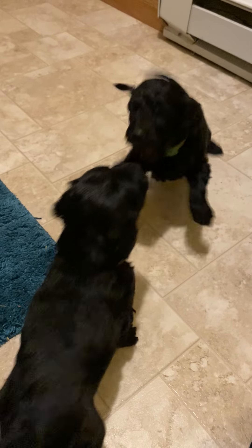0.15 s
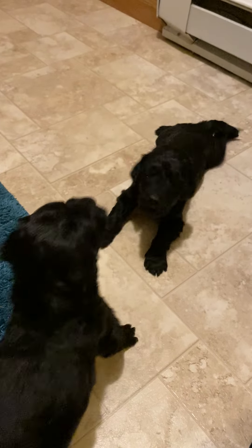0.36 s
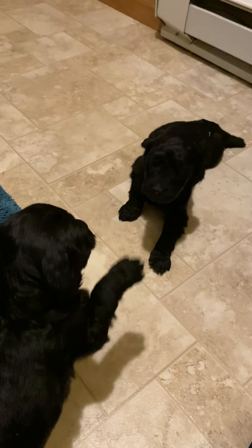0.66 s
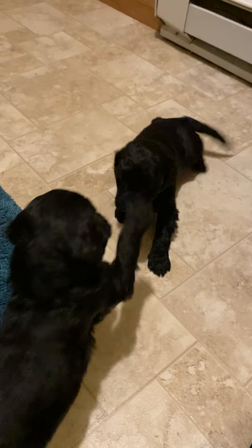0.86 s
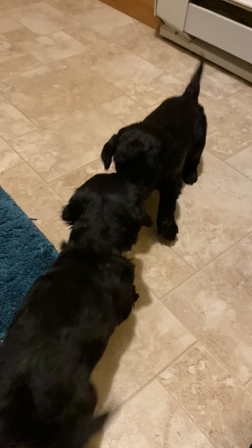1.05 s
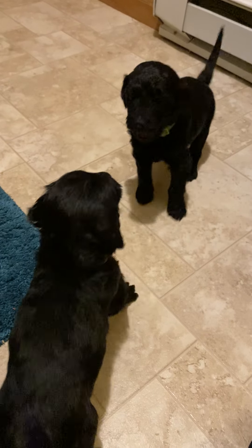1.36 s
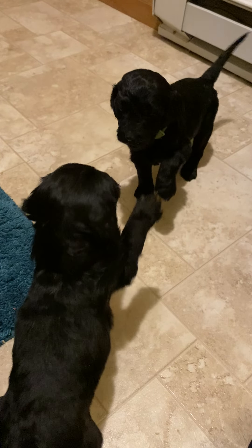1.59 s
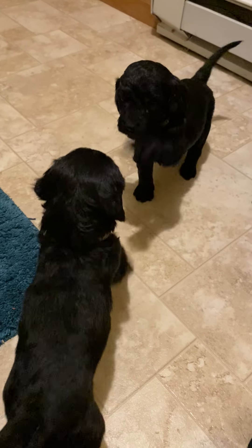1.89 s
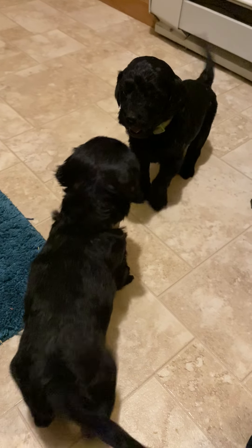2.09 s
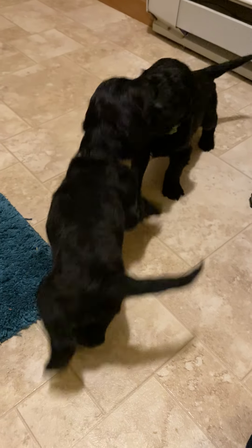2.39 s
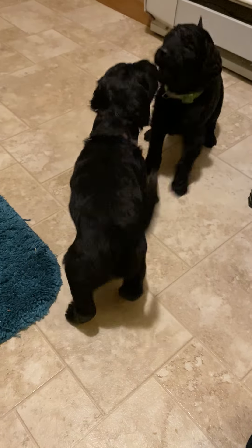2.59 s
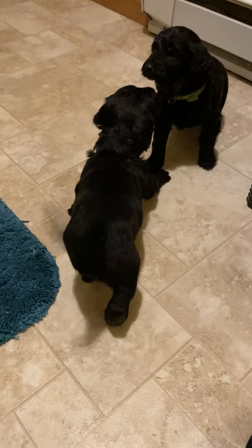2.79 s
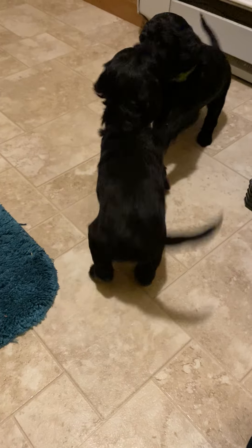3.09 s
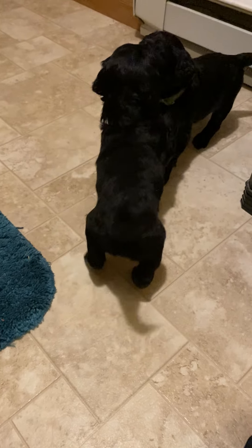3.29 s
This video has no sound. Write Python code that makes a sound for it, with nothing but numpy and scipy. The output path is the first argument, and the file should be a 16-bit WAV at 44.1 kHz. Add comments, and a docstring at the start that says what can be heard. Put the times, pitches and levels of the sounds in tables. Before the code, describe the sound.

Puppy growls come in short rough bursts, first a strong one, then briefer ones and a longer run, with small claw ticks, scuffs and soft paw thuds, heard closely in a small room.

```python
"""Short rough growls come first to the ear: two puppies play-fight on a vinyl floor in a small room.
Each growl is a source and filter: a wavering tone and uneven throat pulses ring chest and mouth,
with breath puffed once a cycle; lone pulses croak. Claws tick as noise cracks with short rings, paws
scuff as grainy coloured noise and land as decaying low sines, over a low house rumble and faint hiss.
A decaying-noise room answers, and two close microphone ports hear it all."""
import sys
import numpy as np
from scipy import signal
from scipy.fft import rfft, irfft, next_fast_len
from scipy.io import wavfile
from scipy.ndimage import map_coordinates

SR = 44100
rng = np.random.default_rng(int(sys.argv[2]) if len(sys.argv) > 2 else 0)


def waveform_to_disk(signal):
    """Save audio, clipped to [-1, 1], as 16-bit WAV at the path in sys.argv[1]."""
    frames = np.transpose(np.atleast_2d(signal))
    scaled = np.clip(frames, -1, 1) * 32767
    samples = np.round(scaled).astype(np.int16)
    wavfile.write(sys.argv[1], SR, samples)


N = 152145
T = np.arange(N) / SR


def amp(db):
    """Decibels to amplitude: 20 dB is a factor of ten."""
    return 10 ** (np.asarray(db) / 20)


def unit(x):
    """Normalisation to an rms of 1."""
    return x / np.sqrt(np.mean(x ** 2) + 1e-20)


def along(points, at):
    """Linear interpolation through (place, value) points."""
    return np.interp(at, *np.transpose(points))


def wobble(rate):
    """Band-limited random modulation: a smooth curve through `rate` random knots a second."""
    knots = rng.standard_normal(int(N * rate / SR) + 4)
    return map_coordinates(knots, [T * rate])


def filtered(x, response):
    """Linear filtering: the spectrum of x times a complex response of frequency."""
    m = next_fast_len(N + SR // 2)
    f = np.fft.rfftfreq(m, 1 / SR)
    return irfft(rfft(x, m) * response(f), m)[..., :N]


def peak(f, hz, width):
    """Simple resonance: the response of a damped oscillator, 1 at its centre."""
    return 1j * f * width / (hz * hz - f * f + 1j * f * width)


def ring(x, hz, width):
    """Cascaded resonance: three equal resonators in a row, brought to rms 1."""
    return unit(filtered(x, lambda f: peak(f, hz, width) ** 3))


def gliding(x, hz, width):
    """Heterodyne resonance: shift the moving centre to zero, low-pass, and shift back."""
    phase = 2 * np.pi * np.cumsum(hz) / SR
    carriers = np.array([np.cos(phase), np.sin(phase)])
    lowered = filtered(carriers * x, lambda f: 1 / (1 + 2j * f / width) ** 2)
    return unit((carriers * lowered).sum(axis=0))


def noise(spectrum):
    """Spectral shaping: white noise filtered to a (Hz, dB) outline, at rms 1."""
    logged = [(np.log(hz), db) for hz, db in spectrum]
    return unit(filtered(rng.standard_normal(N), lambda f: amp(along(logged, np.log(f + 1)))))


# Relative spectrum of the house rumble and hiss: frequency_hz, density_db [dB per Hz]
HOUSE_SPECTRUM = [(30, -40), (58, 4), (95, -14), (250, -13), (600, -43), (5000, -37), (15500, -46)]
HOUSE_DB = -55  # rms


def house():
    """Stationary noise: steady random sound, strongest in the bass."""
    return amp(HOUSE_DB) * noise(HOUSE_SPECTRUM)


# Reverberation time of the room: frequency_hz, t60_s
ROOM_T60 = [(200, 0.22), (10000, 0.099)]


def room(x):
    """Diffuse reverberation: a noise tail whose every frequency decays at its own rate."""
    hz, t, bins = signal.stft(rng.standard_normal(SR // 2), SR, nperseg=256)
    decay = amp(-60 * t / along(ROOM_T60, hz)[:, None])
    tail = signal.istft(bins * decay, SR, nperseg=256)[1]
    delayed = np.pad(x, (200, 0))  # samples before the answer begins
    return signal.fftconvolve(delayed, tail / np.linalg.norm(tail))[:N]


# Paws landing: start_s, level_db (before the slow onset shapes the thud)
THUMPS = [(.305, -26), (.425, -27), (.57, -32), (2.72, -24), (3.16, -27), (3.262, -30)]
THUMP_HZ, THUMP_RISE_S, THUMP_T60_S = 68, .012, .17


def thumps():
    """Damped oscillation: the floor gives a soft low thud under each landing paw."""
    out, t = np.zeros(N + SR), T[:SR // 2]
    onset = 1 - np.exp(-(t / THUMP_RISE_S) ** 2)
    thud = onset * amp(-60 * t / THUMP_T60_S) * np.sin(2 * np.pi * THUMP_HZ * t)
    for start_s, level_db in THUMPS:
        out[round(start_s * SR):][:len(t)] += amp(level_db) * thud
    return out[:N]


# Paws sliding: peak_s, length_s, level_db (at the peak, before the grain)
SCUFFS = [(0.14, 0.062, -53.5), (0.335, 0.33, -49.5), (0.787, 0.25, -65), (0.93, 0.049, -56),
          (1.134, 0.047, -56.5), (1.424, 0.074, -56), (2.13, 0.12, -55.5), (2.362, 0.15, -53.5),
          (2.608, 0.083, -56), (2.694, 0.12, -49), (2.845, 0.05, -52), (2.923, 0.053, -46),
          (3.14, 0.48, -60)]
# Relative spectrum of the rubbing: frequency_hz, density_db [dB per Hz]
FUR_SPECTRUM = [(500, -32.5), (3000, 1), (5500, 6), (10000, 2), (15500, -6.5)]


def scuffs():
    """Friction noise: coloured, grainy rubbing that swells and fades with each slide."""
    swell = sum(amp(level_db) * np.exp(-(3 * (T - peak_s) / length_s) ** 2)
                for peak_s, length_s, level_db in SCUFFS)
    grain = amp(2.5 * wobble(150))
    return swell * grain * noise(FUR_SPECTRUM)


# Claws on the floor: start_s, level_db (of the ring before decay), ring_hz
CLAWS = [(0.9073, -35, 2060), (0.9941, -30, 5530), (1.1922, -39, 10500), (1.2982, -36, 9460),
         (1.956, -29, 1785), (2.5283, -40, 2235), (2.6999, -33.5, 2326), (3.2256, -34, 5990)]
TICK_T60_S, RING_T60_S = .014, .008


def claws():
    """Impact excitation: a broadband crack and a short damped ring for each claw."""
    out, t = np.zeros(N + SR), T[:2000]
    for start_s, level_db, ring_hz in CLAWS:
        bright_noise = np.diff(rng.standard_normal(len(t) + 1)) / 3
        crack = amp(-60 * t / TICK_T60_S) * bright_noise
        ringing = amp(-60 * t / RING_T60_S) * np.sin(2 * np.pi * ring_hz * t)
        out[round(start_s * SR):][:len(t)] += amp(level_db) * (crack + ringing)
    return out[:N]


# Single throat pulses: start_s, level_db (the strongest sets the peak of the whole layer)
CROAKS = [(0.1146, -30.5), (1.0116, -46), (1.035, -56), (1.051, -41), (1.0972, -44), (1.1068, -38),
          (1.1801, -50)]
# Upper mouth resonance, moving with the lips, for croaks and growls: time_s, centre_hz
UPPER_MOUTH = [(.12, 2184), (.5, 1936), (1.3, 2123), (1.43, 2407), (1.95, 2094), (2.2, 2186), (2.42, 2140),
               (2.55, 2360), (3.0, 1960)]
UPPER_WIDTH_HZ = 350
LOWER_HZ, LOWER_WIDTH_HZ = 1525, 360  # lower mouth resonance


def croaks():
    """Impulse response: each lone pulse rings the open mouth for a moment."""
    pulses = np.zeros(N)
    for start_s, level_db in CROAKS:
        pulses[round(start_s * SR)] = amp(level_db)
    upper = gliding(pulses, along(UPPER_MOUTH, T), UPPER_WIDTH_HZ)
    lower = unit(filtered(pulses, lambda f: peak(f, LOWER_HZ, LOWER_WIDTH_HZ)))
    rung = upper + lower
    return rung * pulses.max() / np.abs(rung).max()


# Soft tissue flaps: time_s, flaps_so_far [count], depth [0-1]
FLAPS = [(.228, 0, .3), (.4, 5, .7), (1.3, 29, .2), (1.86, 44, .7), (2.078, 50, 1), (2.355, 57, 1),
         (2.58, 63, .1)]


def flapping():
    """Periodic modulation: soft tissue closes in narrow pulses, one for each whole flap counted."""
    time_s, count, depth = np.transpose(FLAPS)
    return np.interp(T, time_s, depth) * np.cos(np.pi * np.interp(T, time_s, count)) ** 4


FLUTTER_DB, FLUTTER_PER_S = 3, 60  # bound of the level flutter either way; random knots a second


def flutter():
    """Amplitude modulation: a smooth random gain of bounded depth."""
    return amp(FLUTTER_DB * np.tanh(wobble(FLUTTER_PER_S)))


# Growls and the pauses between: time_s, level_db, lower_mouth_db, upper_mouth_db (both over level_db)
GROWLS = [(0.074, -61.5, -34, -32), (0.081, -39.5, -42, -43), (0.117, -52.5, -13, 9.5),
          (0.193, -58, -30, -16), (0.215, -34, -13.5, -11.5), (0.291, -35.5, -1, -8),
          (0.298, -24, -4.5, -13.5), (.36, -30, -9.5, -9.5), (.41, -28, -10.5, -8),
          (0.557, -36, -18.5, -32), (0.701, -94.5, -4, -29), (0.793, -51.5, -17, -17),
          (0.983, -101, -38, -24), (1.009, -41, -17, -15.5), (1.07, -43.5, -28, -21), (1.2, -61, -41, -8.5),
          (1.268, -61, -17, -19), (1.329, -44, -3, -7.5), (1.342, -32.5, -12, -17.5),
          (1.439, -51.5, -13, 0.5), (1.549, -81, -29, -1), (1.731, -76, -33, -14),
          (1.769, -40.5, -28, -24.5), (1.87, -33, -17, -20), (2.149, -35, -12, -14.5),
          (2.38, -37.5, -12, -23), (2.481, -59.5, -53, -12.5), (2.535, -50.5, -31, -15),
          (2.586, -67, -3, 3), (2.603, -37, -29, -9.5), (2.72, -29, -23, -27), (2.851, -35.5, -14.5, -12.5),
          (2.98, -36.5, -24, -32), (3.041, -37.5, -10, -10.5), (3.149, -36.5, -7, -10.5),
          (3.22, -39, -33, -31), (3.38, -74.5, 0, -2)]
# Pitch before its waver: time_s, pitch_hz
PITCH = [(.2, 252.8), (.28, 321.8), (.31, 270.3), (.42, 286.8), (.5, 245.9), (1.2, 264.9), (1.28, 199.4),
         (1.33, 268.6), (1.76, 271), (2.05, 285.3), (2.1, 304.9), (2.2, 271.1), (2.6, 243.2), (2.8, 267.2),
         (3.1, 297.3)]
# Share of pulses against pure tone: time_s, roughness [0-1]
ROUGHNESS = [(.2, .2), (.32, .6), (1.25, .8), (1.33, .25), (2.2, .3), (2.8, .35), (2.88, .75)]
# Chest resonances: centre_hz, width_hz, gain_db
CHEST = [(197.7, 67, 21), (259.3, 92, 19.5), (490, 79, -5.5)]
# Moving band of breath in the nose: time_s, centre_hz
NOSE = [(1.85, 5160), (2.4, 6421), (3.2, 5000)]
NOSE_WIDTH_HZ, NOSE_DB = 700, -14  # dB over the lower mouth
PALATE_HZ, PALATE_WIDTH_HZ, PALATE_DB = 3620, 1730, -23  # dB over the lower mouth
THROAT_HZ, THROAT_WIDTH_HZ, THROAT_DB = 804.6, 168, -12.5  # opens with the mouth
BOOM_HZ, BOOM_WIDTH_HZ, BOOM_DB = 374, 45, -4.5  # narrow resonance that stays put; dB over the chest
CHEST_TOP_HZ, MOUTH_TOP_HZ = 950, 2550  # low-pass corners
BREATH_SHARE = .3  # of the mouth sound, the rest being pulses
WAVER, JITTER = .038, .18  # fraction of the pitch; fraction of a period at full roughness
SCATTER_DB, ALTERNATE_DB = 4, 4  # scale of uneven pulse levels; extra level of every other pulse
RATTLE_DIP, RATTLE_DB = .7, 10  # tone lost and mouth gained at a full flap


def growls():
    """Source-filter principle: a tone, rough throat pulses and breath excite chest, throat and mouth."""
    rows, rough, flap = np.array(GROWLS), along(ROUGHNESS, T), flapping()
    level_db, lower_db, upper_db = (np.interp(T, rows[:, 0], column) for column in rows.T[1:])
    cycles = np.cumsum(along(PITCH, T) * (1 + WAVER * wobble(FLUTTER_PER_S))) / SR
    whole = cycles.astype(int)
    phase = cycles - whole
    tone = unit(flutter() * np.sin(2 * np.pi * cycles))

    # one pulse a cycle, uneven in level and, when rough, in time
    scatter_db = SCATTER_DB * rng.uniform(-2.6, 1, N)
    size = amp(scatter_db + ALTERNATE_DB * (np.arange(N) % 2))[whole]
    starts = np.flatnonzero(np.diff(whole))
    period = SR / along(PITCH, T[starts])  # samples
    slip = JITTER * rough[starts] * period * rng.standard_normal(len(starts))
    pulses = np.bincount(np.clip(starts + slip, 0, N - 1).astype(int), size[starts], N)
    rattle = amp(RATTLE_DB * flap)
    rattled_pulses = pulses * rattle

    def breath():
        """Pulsed turbulence: noise that starts strong and fades in every cycle."""
        puff = size * (1 - phase) ** 2
        return unit(puff * flutter() * rattle * rng.standard_normal(N))

    def mouth(resonate):
        """Cavity resonance: pulses and breath ring it, and little treble leaves it."""
        mixed = (1 - BREATH_SHARE) * resonate(rattled_pulses) + BREATH_SHARE * resonate(breath())
        return unit(filtered(mixed, lambda f: 1 / (1 + (f / MOUTH_TOP_HZ) ** 10)))

    def chest_response(f):
        """Parallel resonances under a gentle low-pass."""
        body = sum(amp(gain_db) * peak(f, hz, width) for hz, width, gain_db in CHEST)
        return body / (1 + 1j * f / CHEST_TOP_HZ) ** 2

    chest = unit(filtered(pulses, chest_response))
    boom = amp(BOOM_DB) * ring(pulses, BOOM_HZ, BOOM_WIDTH_HZ)
    voice = np.sqrt(1 - rough) * tone + np.sqrt(rough) * (chest + boom)

    throat = mouth(lambda x: ring(x, THROAT_HZ, THROAT_WIDTH_HZ))
    lower = mouth(lambda x: ring(x, LOWER_HZ, LOWER_WIDTH_HZ))
    upper = mouth(lambda x: gliding(x, along(UPPER_MOUTH, T), UPPER_WIDTH_HZ))
    nose = amp(NOSE_DB) * gliding(breath(), along(NOSE, T), NOSE_WIDTH_HZ)
    palate = amp(PALATE_DB) * ring(breath(), PALATE_HZ, PALATE_WIDTH_HZ)
    opened = amp(THROAT_DB + lower_db / 2) * throat  # the throat follows half the mouth's opening
    opened += amp(lower_db) * (lower + nose + palate)
    opened += amp(upper_db) * upper
    return amp(level_db) * ((1 - RATTLE_DIP * flap) * voice + opened)


# Lead of the left port: frequency_hz, lead [radians]
PORT_LEAD = [(300, 0), (1200, -.4), (2600, .5), (5000, .7), (7250, 3.14), (16700, 12.56)]
# Left port over right: frequency_hz, tilt_db
PORT_TILT = [(450, .3), (800, 5.5), (1200, -1), (3500, -3), (5200, 0)]
# Likeness of the ports before lead and tilt: frequency_hz, likeness [0-1]
PORT_ALIKE = [(80, 1), (400, .975), (750, .5), (1600, .97), (3200, .6), (5200, .88)]


def ports(shared, differing):
    """Interchannel coherence: two ports add a shared part and an opposed part, with lead and tilt."""
    side = np.array([[.5], [-.5]])  # left, right

    def port(f):
        return amp(side * along(PORT_TILT, f)) * np.exp(1j * side * along(PORT_LEAD, f))

    def angle(f):
        return np.arccos(np.clip(along(PORT_ALIKE, f), 0, 1)) / 2

    common = filtered(shared, lambda f: port(f) * np.cos(angle(f)))
    opposed = filtered(differing, lambda f: 2 * side * port(f) * np.sin(angle(f)))
    return common + opposed


ROOM_DB = -7  # gain of the room in the shared part


def scene():
    """Superposition: direct sounds, the room's answer and the house add at the ports."""
    near = growls() + croaks() + scuffs() + claws()
    shared = near + amp(ROOM_DB) * room(near) + thumps() + house()
    differing = room(near) + house()
    return ports(shared, differing)


MIC_LOW_HZ, TOP_HZ = 39, 15900  # bass corner and band limit


def record(dry):
    """Band-pass transduction: the microphone loses the deepest bass and all above its band limit."""
    return filtered(dry, lambda f: (f < TOP_HZ) / (1 + MIC_LOW_HZ / (1j * f + 1)) ** 2)


dry = scene()
out = record(dry)
waveform_to_disk(out)
```